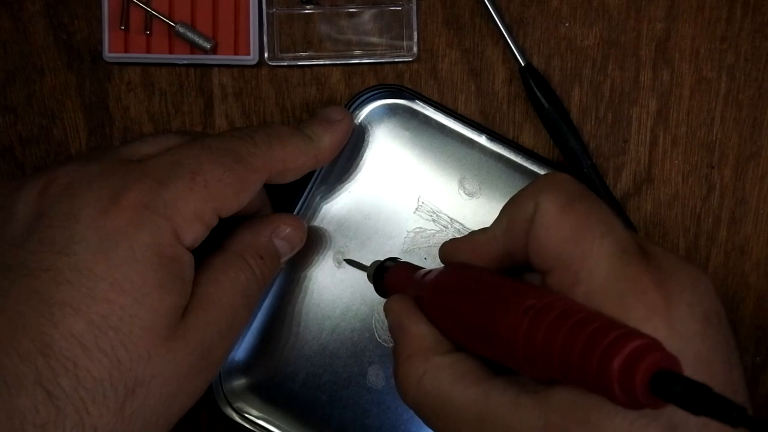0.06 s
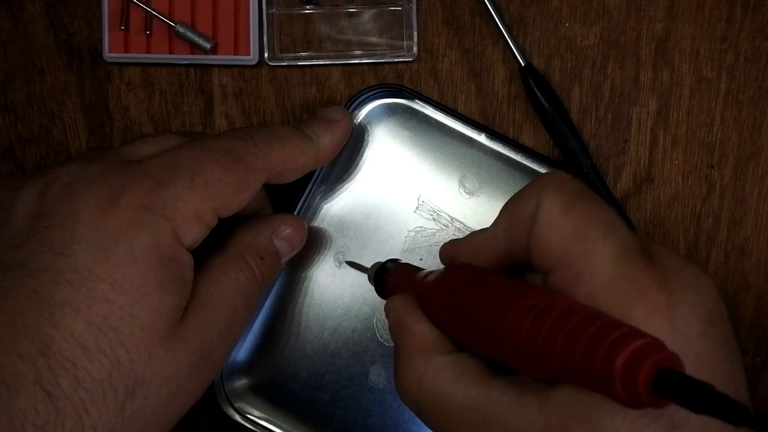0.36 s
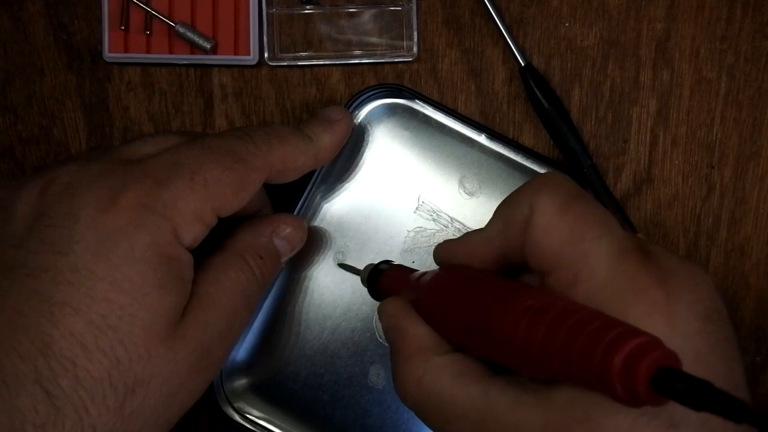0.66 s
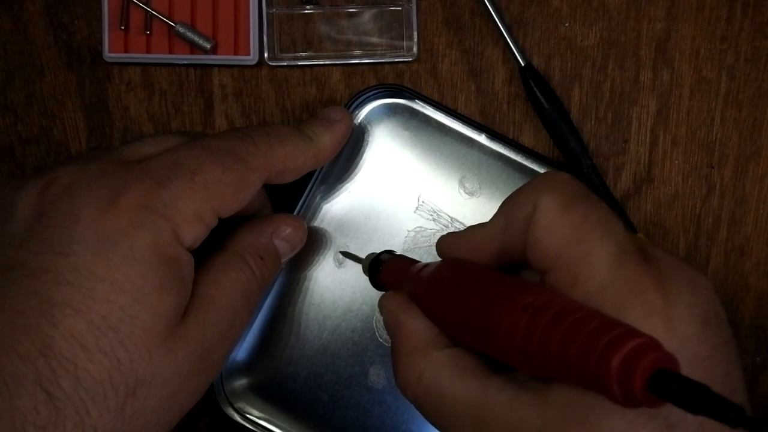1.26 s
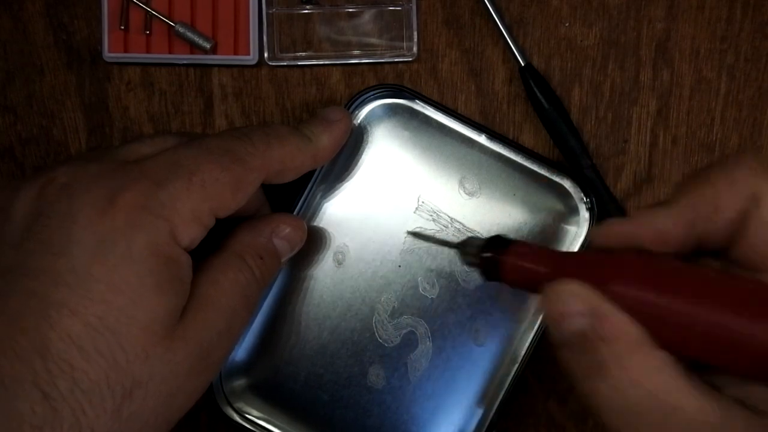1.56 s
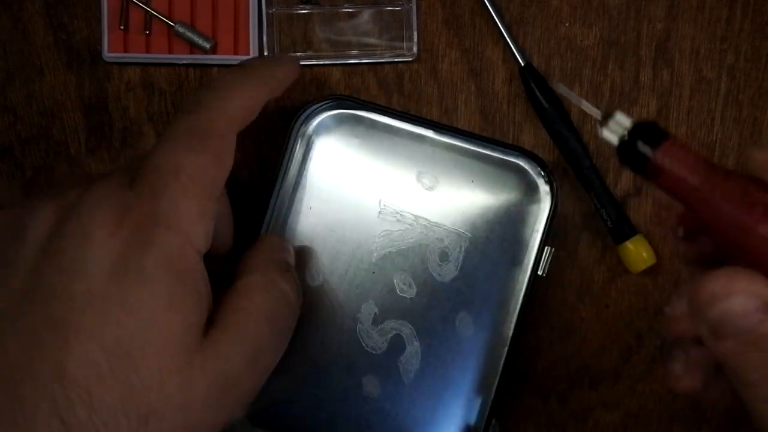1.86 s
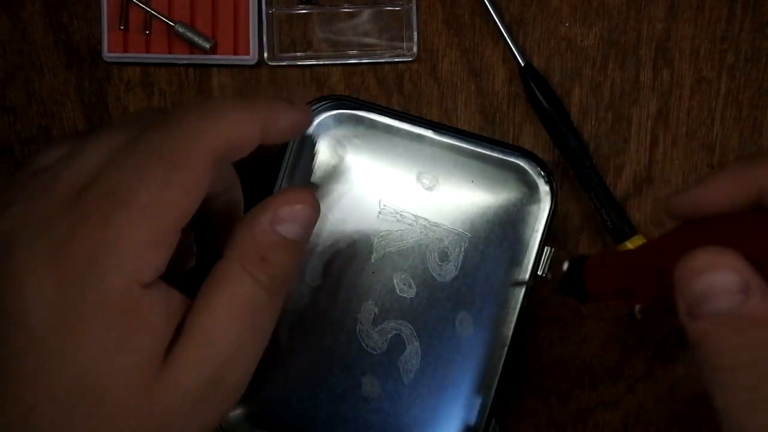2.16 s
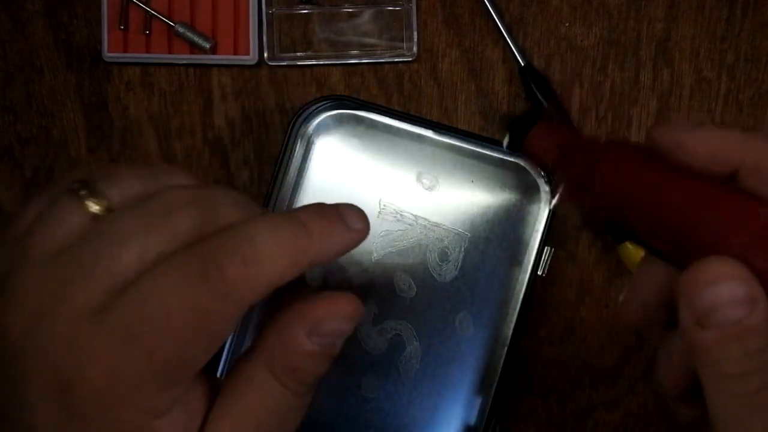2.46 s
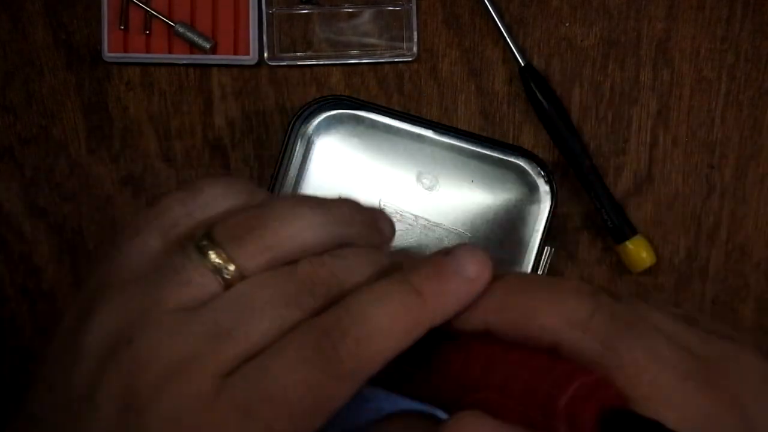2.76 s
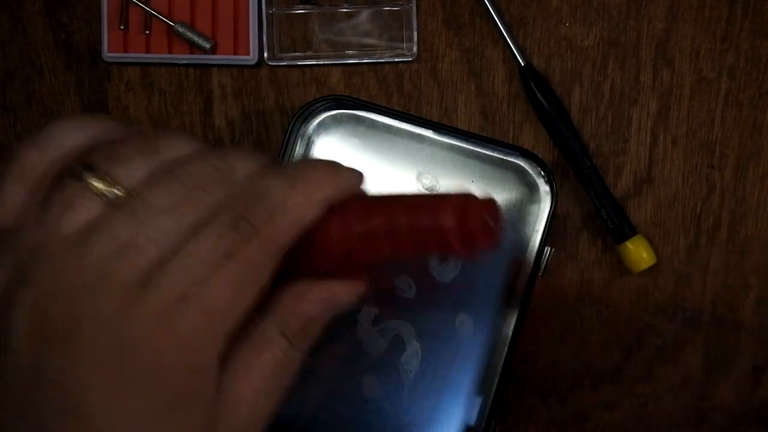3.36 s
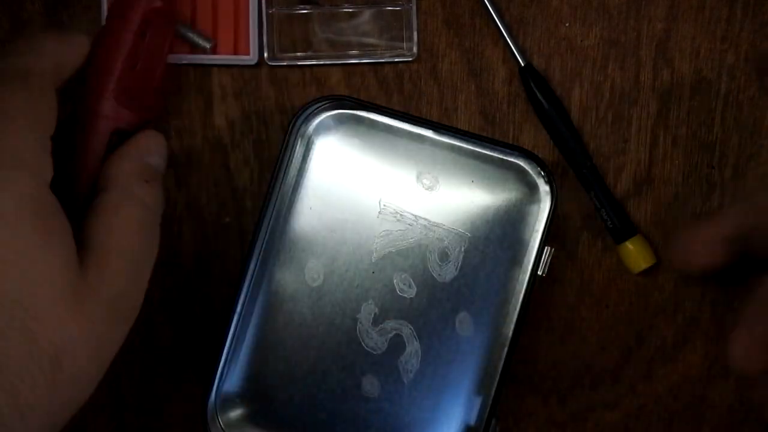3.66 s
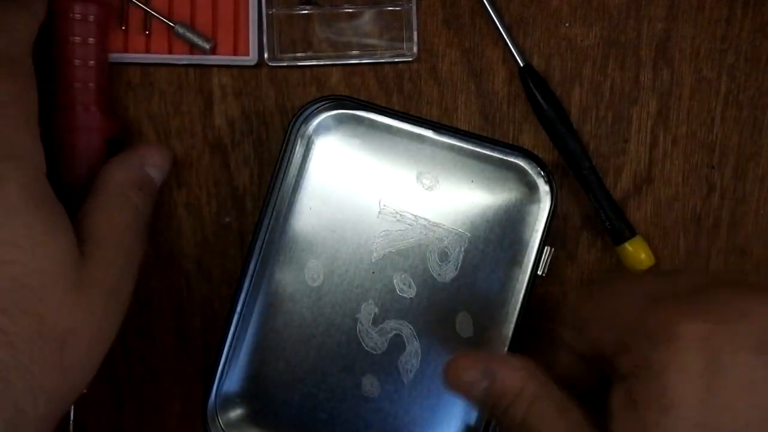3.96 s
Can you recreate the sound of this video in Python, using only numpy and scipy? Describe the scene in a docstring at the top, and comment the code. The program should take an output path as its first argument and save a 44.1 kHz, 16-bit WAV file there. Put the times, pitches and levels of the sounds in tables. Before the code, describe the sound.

Close up in a small room, a handheld rotary engraver rasps on thin metal with brief ringing squeals. Lifted away, its motor spins slightly faster amid faint hand scuffs, before a switch click and a sharp knock on wood.

```python
"""A small rotary engraver grinds a tin lid: the bit strikes once a turn and its chatter excites the
modes of the sheet metal. At 1.5 s it is lifted off; unloaded, the motor whirs a little faster while
hands shift on it. Near 3.4 s it is switched off with a click and coasts down, and near 3.9 s it meets
a wooden table with a sharp knock. A close stereo microphone hears it in a small room."""
import sys
import numpy as np
from scipy import signal
from scipy.fft import rfft, irfft
from scipy.io import wavfile
from scipy.ndimage import uniform_filter1d, map_coordinates

SR = 44100
rng = np.random.default_rng(int(sys.argv[2]) if len(sys.argv) > 2 else 0)


def put_to_file(sound):
    """Save the sound as 16-bit audio at rate SR, in the file named by the first command-line argument."""
    columns = np.atleast_2d(sound).T  # one column per channel
    safe = np.clip(columns, -1, 1)
    whole_steps = np.round(safe * 32767)
    wavfile.write(sys.argv[1], SR, whole_steps.astype(np.int16))


N = 176400
LIFT_S, LIFT_FADE_S, OFF_S = 1.495, 0.016, 3.35

# stereo width of the reflections (frequency [Hz], side gain [dB])
SIDE_SPECTRUM = [(60, -11), (150, -29), (400, -14), (700, -26), (1290, -12), (2380, -6), (4400, -4.5),
                 (8000, 0.5), (15000, -2.5)]


def engraving(t, turn):
    """Forced vibration: one strike a turn gives harmonics; friction between strikes rings the lid."""
    # buzz of the bit (multiple of shaft speed, relative level [dB])
    harmonics = [(3, -10.5), (4, -1.5), (5, -1), (6, -1), (7, -1), (8, -6), (9, 2.5), (10, -8), (11, 3),
                 (12, -2.5), (13, -6), (15, -9), (16, -1.5), (17, -3), (18, -4.5), (22, -8), (25, -15.5),
                 (28, -13), (32, -11.5)]
    # grinding spectrum (frequency [Hz], relative level [dB])
    grind = [(25, -64), (70, -43), (180, -15.5), (350, -8), (500, -7), (650, 2), (1100, 2.5), (1600, 0.5),
             (2000, -7.5), (2600, -4), (3500, -10), (5000, -12), (7300, -14), (8500, -24.5), (12000, -23.5),
             (16000, -40)]
    # the lid's bands as the bit presses and wanders (time [s], low [dB], middle [dB], high [dB])
    band_levels = [(0.0, -20, -33, -22.5), (0.048, -21.5, -21.5, -23), (0.164, -27.5, -28.5, -24.5),
                   (0.354, -21, -23.5, -21.5), (0.465, -27, -27.5, -25.5), (0.568, -20, -24, -23),
                   (0.712, -26, -32, -25), (0.832, -25.5, -24.5, -26.5), (0.906, -22, -27.5, -24.5),
                   (0.992, -27.5, -31.5, -27), (1.108, -24, -25.5, -21.5), (1.15, -20, -29.5, -27),
                   (1.216, -28.5, -37, -26.5), (1.36, -23.5, -26.5, -23.5), (1.48, -28.5, -37, -27.5)]
    # low hum of the lid (time [s], first harmonic [dB], second harmonic [dB])
    hum_levels = [(0.0, -35, -38.5), (0.12, -37, -39.5), (0.31, -35.5, -32.5), (0.39, -45.5, -31.5),
                  (0.49, -35, -36.5), (0.57, -39.5, -29.5), (0.7, -41, -41.5), (0.77, -40, -35.5),
                  (1.05, -42.5, -35.5), (1.12, -47, -40), (1.418, -48, -36), (1.47, -48.5, -54)]
    bounce = turn + 0.0069 * walk(150)
    buzz = tones(bounce, harmonics, flutter_db=3, flutter_hz=24, slip_rad=.42)
    chatter = colour(contacts(turn, per_s=4000, bunching=0.18, scatter_db=2), grind)
    bite = undb(1.1 * walk(44.2))
    metal = undb(-1.5) * buzz + bite * (undb(-5.5) * unit(chatter) + undb(-8) * lid(chatter))
    bands = split(metal, edges_hz=(1150, 2000))
    metal = sum(unit(band) * undb(curve(t, band_levels, k + 1)) for k, band in enumerate(bands))
    hum = np.sqrt(2) * sum(undb(curve(t, hum_levels, k)) * np.sin(2 * np.pi * k * turn) for k in (1, 2))
    touching = np.clip((LIFT_S - t) / LIFT_FADE_S + 1, 0, 1)
    return (metal + undb(0.8) * hum) * touching


def lid(force, digging=False):
    """Plate resonance: the modes drift together with the bit's place and pressure."""
    # modes of the lid (frequency [Hz], skimming gain [dB], digging gain [dB])
    modes = [(628, -2.5, -3.5), (743.5, 4.5, -18), (804, -4, 0.5), (894, 1.5, -18), (1510, 2, 0.5),
             (1814, 1, -2), (2086, 6.5, -0.5), (2374, 8, -14), (2555, 1, 0.5), (3230, -12, -4),
             (3570, 9.5, -13), (4100, -1, -6), (4720, 2, -15)]
    width_hz, drift_share = 18.3, .006
    ring = resonate(force, [(hz, width_hz, dig if digging else skim) for hz, skim, dig in modes])
    warped = np.arange(N) + np.cumsum(drift_share * walk(9))
    return unit(map_coordinates(ring, [warped], order=3, mode="mirror"))


def digs(t, turn):
    """Impact excitation: pressed harder, the bit catches and rings the lid's modes."""
    # the bit digs in (time [s], half-width [s], level [dB])
    presses = [(0.332, 0.022, -25), (.59, 0.027, -24), (1.097, 0.031, -15.5), (1.32, .045, -28.5),
               (1.394, 0.041, -25.5), (1.485, 0.022, -27)]
    catches = contacts(turn, per_s=3400, bunching=0.68, scatter_db=2)
    return lid(catches, digging=True) * sum(undb(db) * bell(t, at, span) for at, span, db in presses)


def squeals(t, turn):
    """Resonance: a shaft harmonic swells briefly on a lid mode, roughened by the bouncing bit."""
    # squeals (time [s], half-width [s], multiple of shaft speed, level [dB])
    swells = [(.005, 0.034, 17, -24), (0.036, .04, 5, -25.5), (0.062, 0.053, 9, -19),
              (0.248, .058, 11, -23), (.25, 0.067, 16, -25.5), (0.33, 0.052, 6, -31),
              (0.343, 0.041, 9, -24.5), (0.748, .06, 16, -26), (0.823, 0.019, 11, -29.5),
              (1.24, 0.05, 16, -22.5), (1.315, 0.034, 17, -26)]
    slip = 0.38 * walk(60.4)
    return sum(np.sqrt(2) * undb(db) * bell(t, at, span) * np.sin(2 * np.pi * k * turn + slip)
               for at, span, k, db in swells)


def freed_bit(t, turn):
    """Phase modulation roughens a faint buzz of the bit, which fades just after the lift."""
    # buzz of the freed bit (multiple of shaft speed, relative level [dB])
    harmonics = [(5, 0), (6, -2), (9, -3.5), (11, -0.5), (14, 3), (16, -2)]
    envelope = np.interp(t, [LIFT_S - LIFT_FADE_S, LIFT_S, 1.9], [0, 1, 0])
    buzz = tones(turn + .01 * walk(110), harmonics, flutter_db=2, flutter_hz=40, slip_rad=.7)
    return undb(-32.5) * envelope * buzz


def motor(t, turn):
    """Rotating-machine noise: the whir stops with the current; bearing and brush friction dies slowly."""
    # motor tones (multiple of shaft speed, relative level [dB])
    harmonics = [(5, -18), (7, -8.5), (8, 1.5), (9, 3), (10, -2.5), (12, -2), (13, -1), (15, -14), (17, -6)]
    # steady tones of the three-pole rotor (multiple of shaft speed, level [dB])
    pole_tones = [(3, -49), (6, -51)]
    # housing resonances (frequency [Hz], bandwidth [Hz], gain [dB])
    housing_modes = [(719, 44, -8), (1144, 78, -1.5), (1227, 93, -3.5), (1366, 62, -2.5), (1880, 260, -10)]
    # course of the motor's sound (time [s], whir level [dB], rattle level [dB])
    levels = [(1.55, -35.5, -35.5), (1.998, -31, -34.5), (2.028, -25, -34), (2.082, -34, -35),
              (2.122, -31.5, -35), (2.212, -28, -34), (2.622, -29.5, -36.5), (2.75, -29, -34),
              (2.84, -32, -36.5), (3.07, -28, -35), (3.34, -28.5, -36.5)]
    # bearing rattle (frequency [Hz], relative level [dB])
    rattle_spectrum = [(25, -43), (80, -13), (180, -7.5), (350, -9.5), (650, 1.5), (900, -1), (1400, 6),
                       (2300, 3), (2700, 4), (3800, 0.5), (5000, -14.5), (8000, -35), (16000, -31)]
    # brush hiss (frequency [Hz], relative level [dB])
    brush_spectrum = [(2000, -14.5), (4500, 1), (5800, -3.5), (7300, -1), (8500, -3.5), (11000, -6.5),
                      (13000, -9.5), (15500, -26)]
    # barrel resonances, rung by the bearings (frequency [Hz], bandwidth [Hz], gain [dB])
    barrel_modes = [(1500, 60, 0), (2700, 140, 10), (3640, 171, 2.5), (3870, 99, 2.5)]
    # ringing of the barrel (time [s], level [dB])
    barrel_levels = [(1.5, -55), (2.65, -42.5), (3.05, -35), (3.4, -39), (3.6, -56), (3.8, -79.5), (4, -70)]
    # brief flares of the hiss (time [s], half-width [s], boost [dB])
    flares = [(2.198, .018, 4.5), (3.495, 0.016, 1.5)]
    whir_decay_s, brush_hold_s = 0.018, 0.043
    rattle_db_per_s, brush_db_per_s = 26.5, 47
    coast = np.maximum(t - OFF_S, 0)
    rotor = tones(turn + .004 * walk(90), harmonics, flutter_db=1.7, flutter_hz=30, slip_rad=.35)
    housing = unit(resonate(contacts(turn, per_s=3300, bunching=0.3, scatter_db=-1), housing_modes))
    whir = (rotor + housing) * undb(curve(t, levels) - 3.5)
    poles = np.sqrt(2) * sum(undb(db) * np.sin(2 * np.pi * k * turn) for k, db in pole_tones)
    powered = (whir + poles) * np.exp(-coast / whir_decay_s)
    flare_db = sum(db * bell(t, at, span) for at, span, db in flares)
    rattle = unit(colour(contacts(turn, per_s=5000, bunching=0.083, scatter_db=3.5), rattle_spectrum))
    rattle *= undb(curve(t, levels, 2) + 1 + flare_db / 2 - rattle_db_per_s * coast)
    brush = unit(colour(contacts(2 * turn, per_s=14000, bunching=0.083, scatter_db=3.5), brush_spectrum))
    barrel = unit(resonate(contacts(turn, per_s=11000, bunching=0.3, scatter_db=7.5), barrel_modes))
    barrel *= undb(curve(t, barrel_levels))
    brush *= undb(-35.5 + flare_db + .5 * walk(16) - brush_db_per_s * np.maximum(coast - brush_hold_s, 0))
    return powered + barrel + rattle + brush


def lid_reflection(t, x):
    """Comb filtering: the lid reflects the motor along a path that changes as the tool moves."""
    lag_s, gain = 0.000828 + .00005 * walk(2.57), undb(-23.5)
    reflected = map_coordinates(x, [(t - lag_s) * SR], order=3)
    return (x + gain * reflected) / np.hypot(1, gain)


def gliding_hiss(t):
    """Narrow-band noise: its centre rises as the tool swings up off the lid."""
    # peak of the hiss (time [s], centre frequency [Hz], level [dB])
    glide = [(1.38, 6500, -66), (1.47, 6750, -42), (1.67, 7700, -44), (1.74, 8550, -49), (1.84, 9100, -44),
             (2, 8900, -49), (2.3, 9300, -58)]
    width_hz = 744
    noise = signal.sosfilt(signal.butter(2, width_hz / 2, fs=SR, output="sos"), rng.standard_normal((2, N)))
    phase = 2 * np.pi * np.cumsum(curve(t, glide)) / SR
    band = unit(noise[0] * np.cos(phase) + noise[1] * np.sin(phase))
    return band * undb(curve(t, glide, 2)) * (t < OFF_S)


def set_down(t):
    """Impulse response: as the tool lands and rocks, each blow gives a crack and damped modes."""
    # blows on the table (time [s], relative level [dB])
    knocks = [(3.8738, -2), (3.8765, -11), (3.913, -26.5), (3.953, -39), (3.973, -27.5)]
    # modes of tool and table (frequency [Hz], relative level [dB], T60 [s])
    modes = [(687, 0.5, 0.11), (770, 4, 0.025), (1094, 3.5, 0.088), (1300, -13, 0.07), (1830, -2.5, 0.076),
             (2470, -10, .08), (3190, -3, .08), (3600, -3, 0.059), (5500, -6, 0.055), (6520, -13, .07)]
    # crack of the contact (frequency [Hz], relative level [dB])
    spectrum = [(60, -20), (250, -15), (450, 0), (700, 4.5), (2000, 4), (3400, 0), (4300, -9), (6200, -7),
                (8000, -30), (15000, -40)]
    blows = np.zeros(N)
    for at, db in knocks:
        blows[int(at * SR)] += undb(db)
    ring = sum((-1) ** k * undb(db) * np.sin(2 * np.pi * hz * t) * fade(t, 0, t60)
               for k, (hz, db, t60) in enumerate(modes))
    decay = undb(-5) * fade(t, 0, t60=0.024) + undb(-11) * fade(t, 0, t60=0.11)
    envelope = np.sqrt(np.abs(signal.fftconvolve(blows ** 2, decay ** 2)[:N]))  # energies add
    crack = colour(envelope * rng.standard_normal(N), spectrum) / np.std(shaped_noise(spectrum))
    return undb(-16) * signal.fftconvolve(blows, ring)[:N] + crack


def switch(t):
    """Impact transients: the switch snaps over in two bright bursts, each with a faint tail."""
    # snaps (time [s], level [dB])
    snaps = [(3.385, -19.5), (3.388, -28)]
    # spectrum of a snap (frequency [Hz], relative level [dB])
    spectrum = [(1000, -16), (3300, -16), (4400, 1.5), (5600, -4), (7200, 3.5), (9000, -11), (12000, -6),
                (15500, -21)]
    envelope = sum(undb(db) * (fade(t, at, t60=0.044) + 0.1 * fade(t, at, t60=.16)) for at, db in snaps)
    return unit(shaped_noise(spectrum)) * envelope


def handling(t):
    """Friction noise: hands and tool rub on lid and table in soft thuds and scuffs."""
    # rubs (time [s], half-width [s], thud level [dB], scuff level [dB])
    rubs = [(1.478, 0.055, -39, -28.5), (1.828, 0.032, -38, -33.5), (1.906, 0.058, -36.5, -28.5),
            (1.952, 0.041, -37.5, -36), (3.802, 0.016, -34, -54), (3.826, 0.023, -43, -32),
            (3.841, 0.04, -32, -40), (3.995, 0.029, -49, -37.5)]
    # spectra of thud and scuff (frequency [Hz], relative level [dB])
    thud_spectrum = [(60, -58), (130, -13.5), (185, 5.5), (250, 1.5), (400, -14), (1000, -48.5)]
    scuff_spectrum = [(150, -48), (450, 0), (900, 5), (1500, -2), (3000, -14), (7000, -18.5), (9500, -27),
                      (15000, -40)]
    thud, scuff = unit(shaped_noise(thud_spectrum)), unit(shaped_noise(scuff_spectrum))
    return sum(bell(t, at, span) ** 2 * (undb(thud_db) * thud + undb(scuff_db) * scuff)
               for at, span, thud_db, scuff_db in rubs)


def tool_stereo(direct, diffuse):
    """Early reflections: lid and table return the treble, which leans left; the room adds width."""
    # balance (frequency [Hz], left minus right [dB])
    lean = [(600, -2), (1300, 0.1), (2400, 3.5), (5000, 0.4), (12000, 1.1)]
    low, high = split(direct, edges_hz=[3600])
    near_gain = undb(-4)
    mid = low + (high + near_gain * echoes(high, t60=0.076)) / np.hypot(1, near_gain)
    side = colour(echoes(diffuse, t60=0.048), SIDE_SPECTRUM)
    left = colour(mid + side, [(hz, db / 2) for hz, db in lean])
    right = colour(mid - side, [(hz, -db / 2) for hz, db in lean])
    return np.array([left, right])


def table_stereo(x):
    """Mid-side stereo: short reflections slightly widen the close, central knocks and scuffs."""
    return x + colour(echoes(x, t60=0.032), SIDE_SPECTRUM) * np.array([[1], [-1]])


def room_noise():
    """Ambient noise of a quiet room, partly coherent between the channels."""
    # (frequency [Hz], relative level [dB])
    spectrum = [(22, -13), (40, -24), (65, -2.5), (110, -8), (300, -5), (1000, -7), (4000, -28),
                (15000, -23)]
    mid, side = (unit(shaped_noise(spectrum)) for _ in range(2))
    return undb(-51) * (mid + undb(-7) * side * np.array([[1], [-1]]))


def tones(turn, harmonics, flutter_db, flutter_hz, slip_rad):
    """Harmonics of the shaft speed, each randomly modulated in level and phase."""
    return unit(sum(undb(db + flutter_db * walk(flutter_hz))
                    * np.sin(2 * np.pi * k * turn + slip_rad * walk(flutter_hz) + 2 * np.pi * rng.random())
                    for k, db in harmonics))


def contacts(turn, per_s, bunching, scatter_db):
    """Shot noise: tiny impacts whose energy bunches at one point of every turn."""
    clicks = (rng.random(N) < per_s / SR) * rng.choice([-1, 1], N)
    strength = undb(scatter_db * rng.standard_normal(N)) * np.exp(bunching * np.cos(2 * np.pi * turn))
    return unit(clicks * strength)


def resonate(x, modes):
    """Modal superposition: parallel resonators of alternating sign."""
    return sum((-1) ** k * undb(db) * signal.lfilter(*signal.iirpeak(hz, hz / width, SR), x)
               for k, (hz, width, db) in enumerate(modes))


def echoes(x, t60):
    """Reverberation: convolution with a dying noise tail of unit energy."""
    t = np.arange(SR // 4) / SR
    tail = rng.standard_normal(len(t)) * fade(t, 0, t60)
    return signal.fftconvolve(x, tail / np.linalg.norm(tail))[:N]


def colour(x, spectrum):
    """Minimum-phase filter through (frequency [Hz], gain [dB]) points."""
    hz, db = np.array(spectrum, float).T
    f = np.fft.rfftfreq(2 * N, 1 / SR)
    cepstrum = irfft(np.log(undb(np.interp(np.log(f + 1), np.log(hz), db))))
    cepstrum[1:N] *= 2
    cepstrum[N + 1:] = 0
    return irfft(rfft(x, 2 * N) * np.exp(rfft(cepstrum)))[:N]


def shaped_noise(spectrum):
    """Filtered white noise."""
    return colour(rng.standard_normal(N), spectrum)


def split(x, edges_hz):
    """Complementary bands that add up to the whole."""
    f = np.fft.rfftfreq(2 * N, 1 / SR)
    lows = [0] + [irfft(rfft(x, 2 * N) / (1 + (f / hz) ** 12))[:N] for hz in edges_hz] + [x]
    return [upper - lower for lower, upper in zip(lows, lows[1:])]


def walk(rate_hz):
    """Smooth random fluctuation of rms 1."""
    hold = int(SR / rate_hz)
    steps = np.repeat(rng.standard_normal(N // hold + 2), hold)
    return unit(uniform_filter1d(uniform_filter1d(steps, hold), hold)[:N])


def fade(t, start, t60):
    """Sudden onset and exponential decay, 60 dB in t60 seconds."""
    return (t >= start) * np.exp(-np.log(1000) * np.maximum(t - start, 0) / t60)


def bell(t, at, span):
    """Gaussian pulse, down to 1/e one span from its peak."""
    return np.exp(-((t - at) / span) ** 2)


def curve(t, table, column=1):
    """Linear interpolation of one column over time."""
    rows = np.array(table)
    return np.interp(t, rows[:, 0], rows[:, column])


def undb(db):
    """Decibels to gain."""
    return 10 ** (np.asarray(db) / 20)


def unit(x):
    """Scale to rms 1."""
    return x / np.sqrt(np.mean(x ** 2))


def scene():
    """Superposition: one shaft drives bit and motor; handling, knocks and the room add to them."""
    # powered shaft, slower under load (time [s], speed [turns/s])
    shaft_speed = [(0, 146.1), (.04, 146), (.24, 147), (.36, 147.6), (.49, 146.3), (.7, 148), (.77, 147.9),
                   (1.03, 147.9), (1.12, 149.2), (1.31, 149.8), (1.47, 148.3), (1.56, 152.9), (2.1, 153.9),
                   (3.1, 154.3)]
    coast_s = 0.45
    t = np.arange(N) / SR
    speed = curve(t, shaft_speed) * (1 + 0.0015 * walk(18)) * np.exp(-np.maximum(t - OFF_S, 0) / coast_s)
    turn = np.cumsum(speed) / SR
    # treble radiated sideways is incoherent with that sent to the microphone
    front, sideways = (engraving(t, turn) + digs(t, turn) + squeals(t, turn) + freed_bit(t, turn)
                       + gliding_hiss(t) + lid_reflection(t, motor(t, turn)) + switch(t) for _ in range(2))
    crossover_hz = [2520]
    diffuse = split(front, crossover_hz)[0] + split(sideways, crossover_hz)[1]
    return room_noise() + tool_stereo(front, diffuse) + table_stereo(handling(t) + set_down(t))


def record(dry):
    """Clipping limits the loudest knock; a low-pass filter cuts the top at 15.7 kHz."""
    return signal.sosfilt(signal.ellip(10, .1, 80, 15700, fs=SR, output="sos"), np.clip(dry, -1, 1))


dry = scene()
out = record(dry)
put_to_file(out)
```